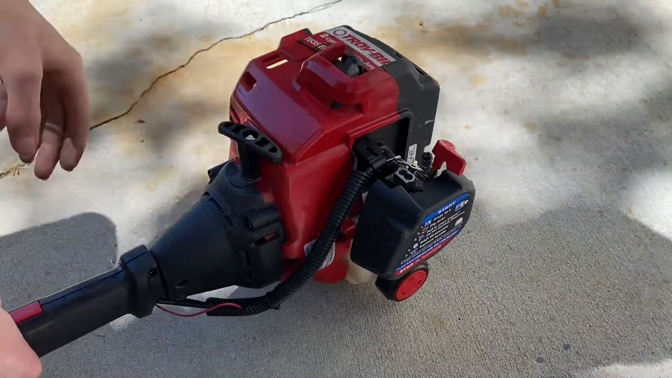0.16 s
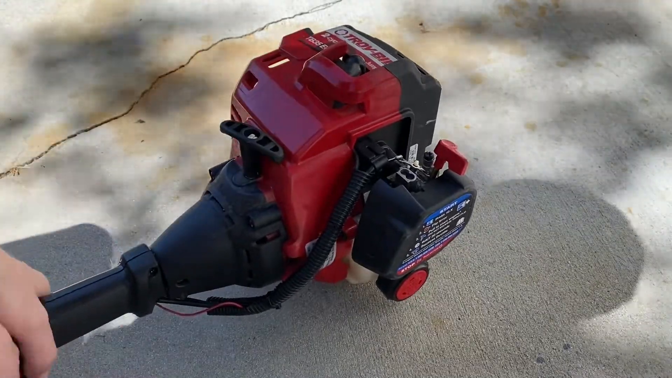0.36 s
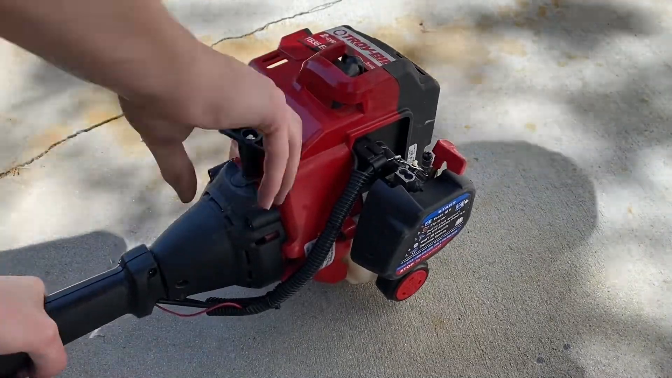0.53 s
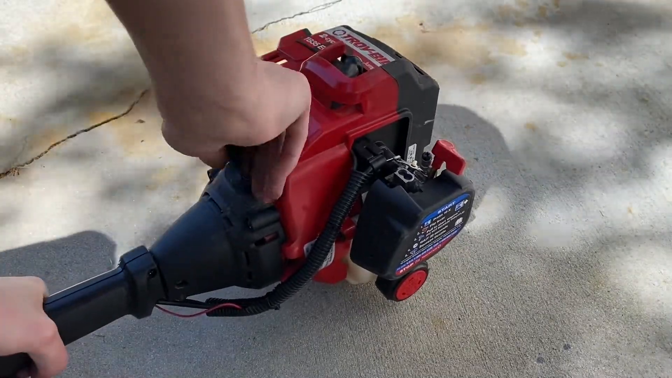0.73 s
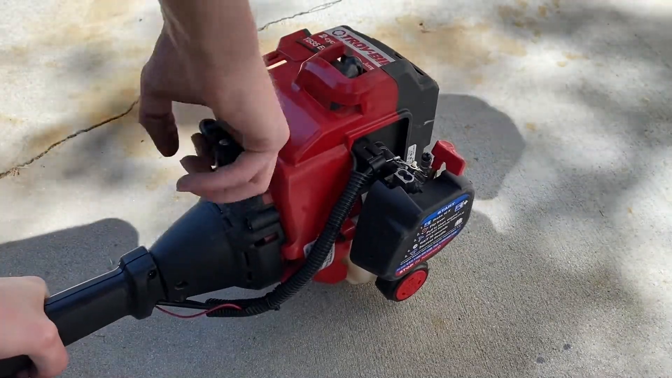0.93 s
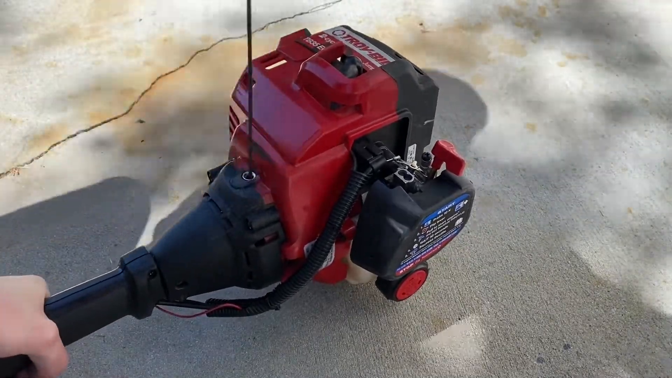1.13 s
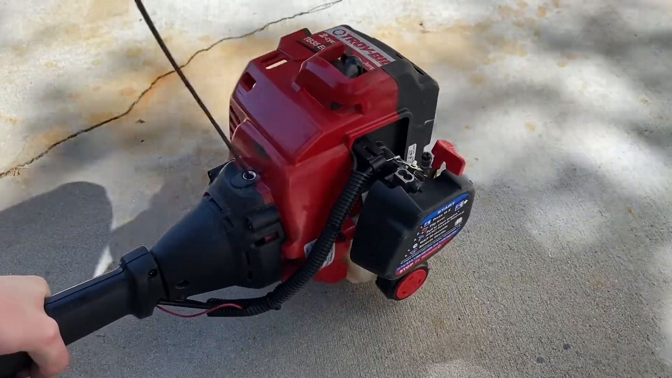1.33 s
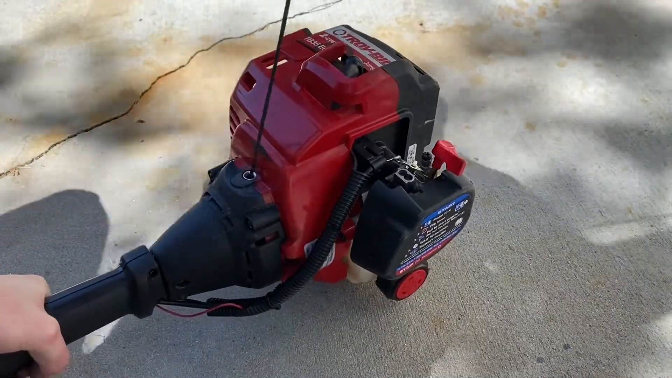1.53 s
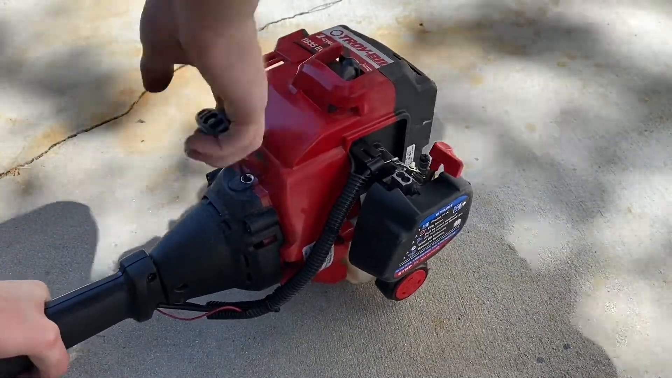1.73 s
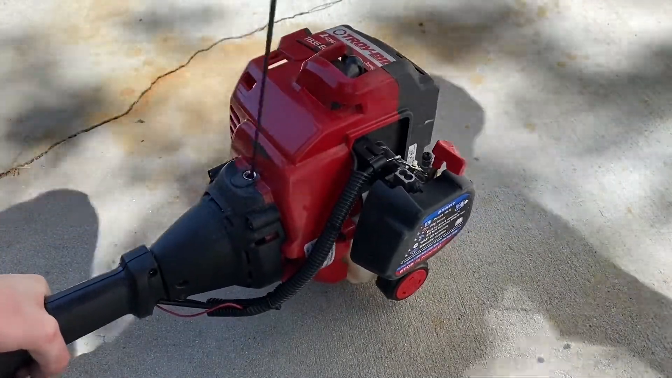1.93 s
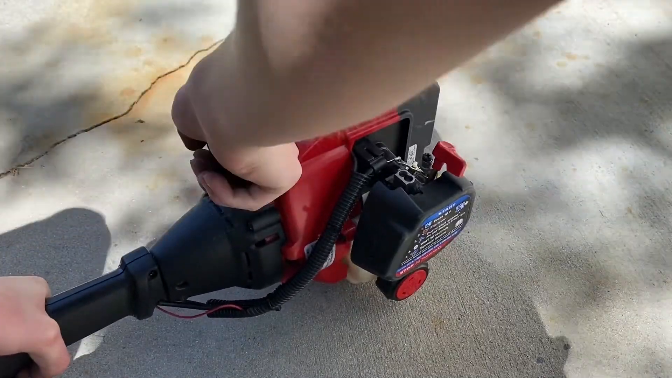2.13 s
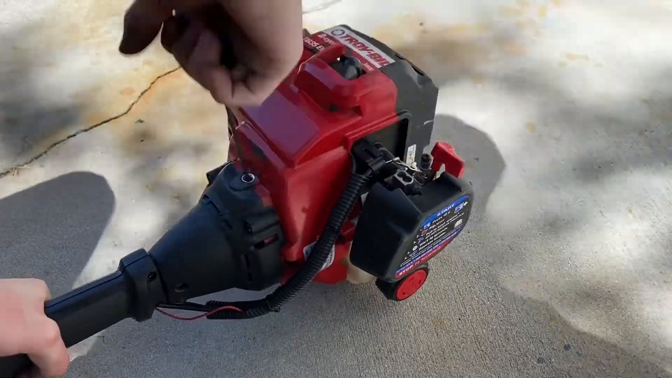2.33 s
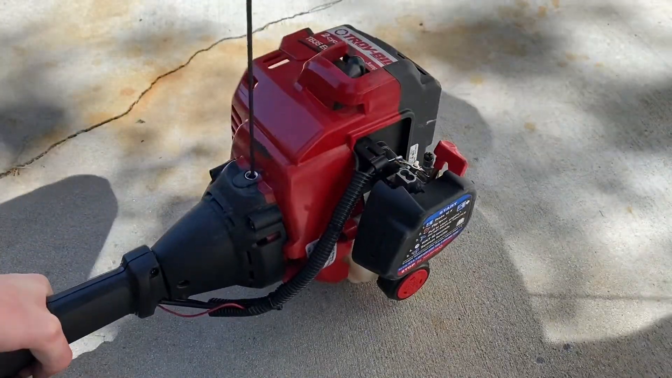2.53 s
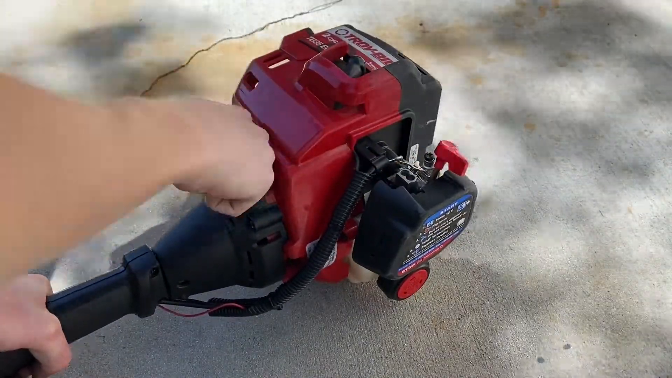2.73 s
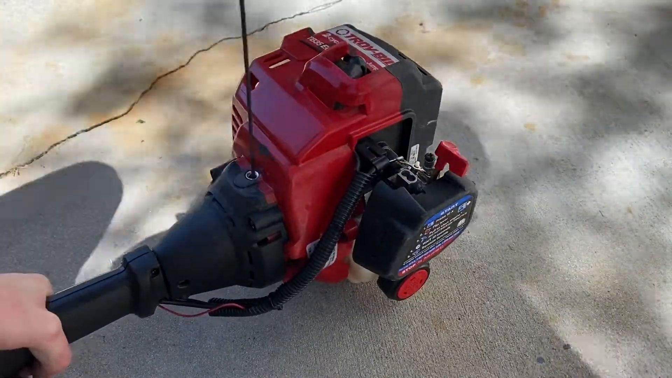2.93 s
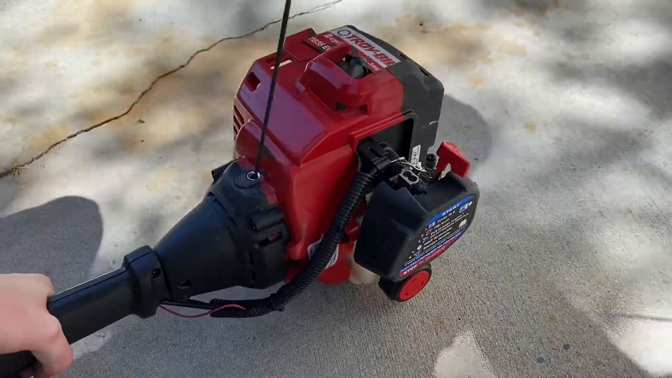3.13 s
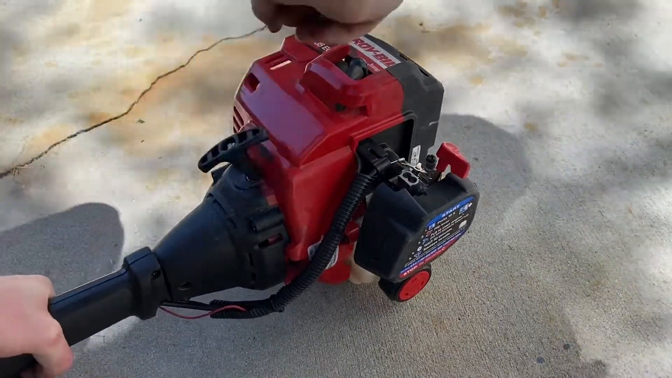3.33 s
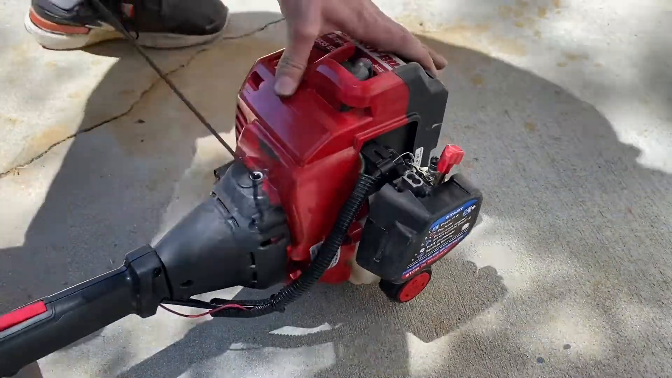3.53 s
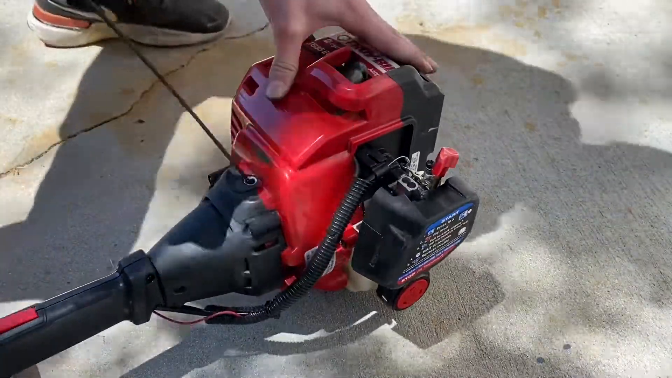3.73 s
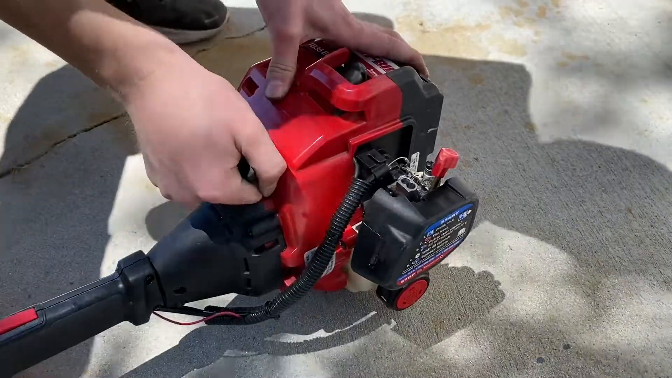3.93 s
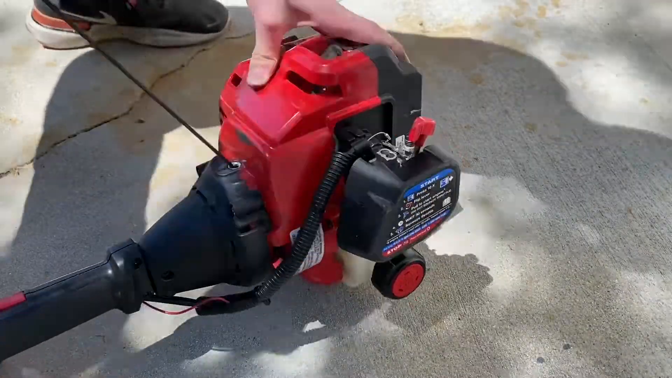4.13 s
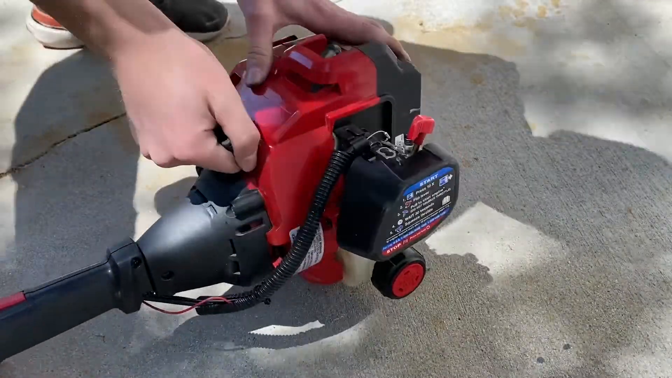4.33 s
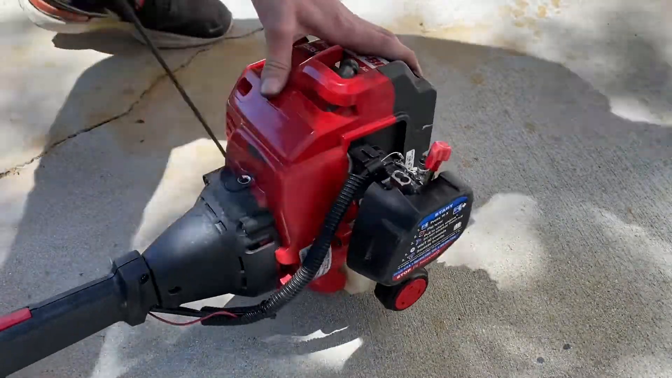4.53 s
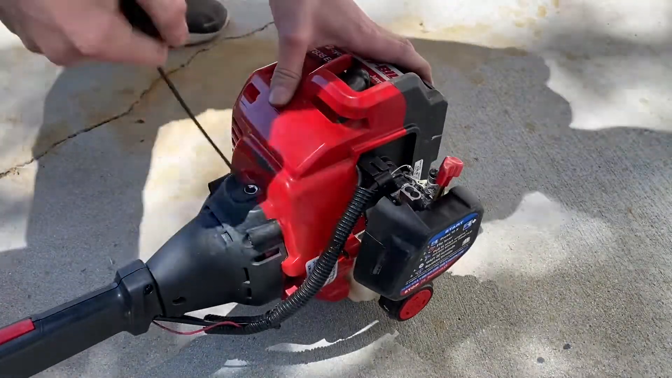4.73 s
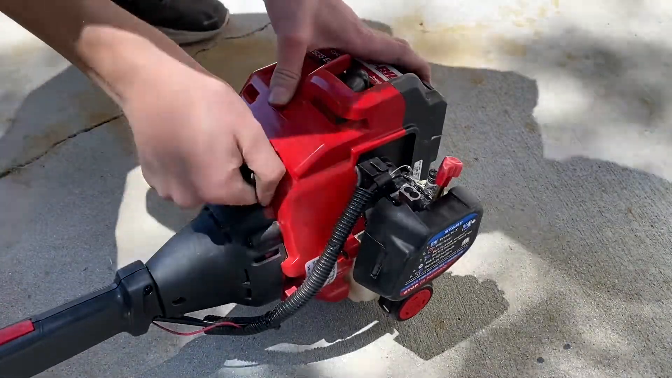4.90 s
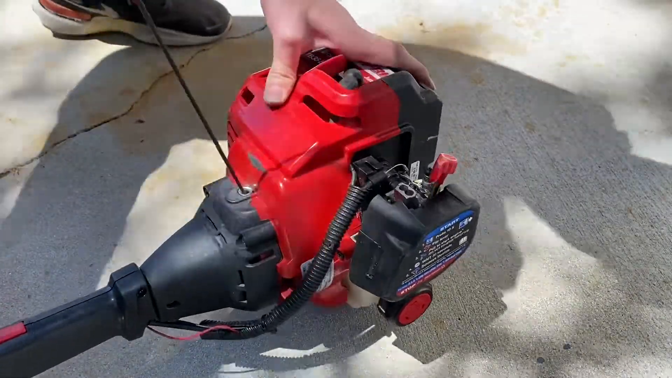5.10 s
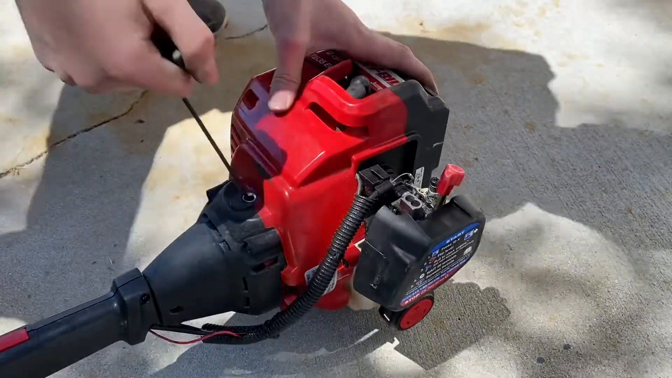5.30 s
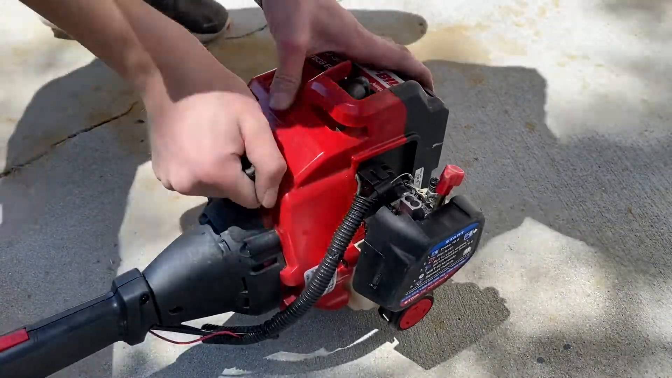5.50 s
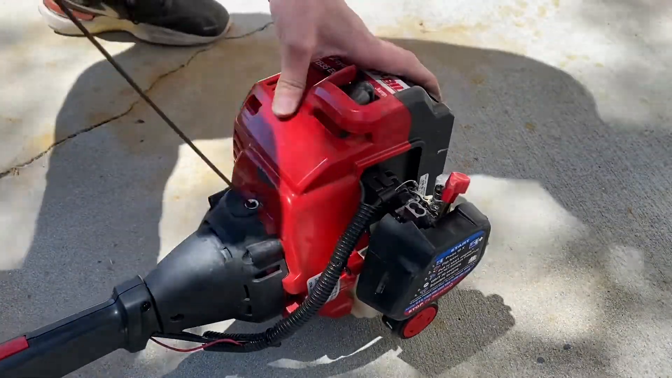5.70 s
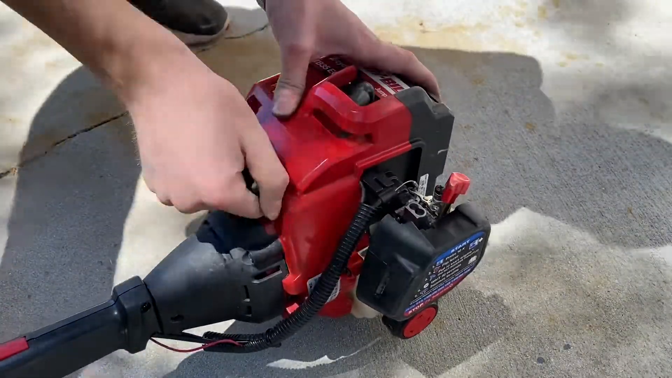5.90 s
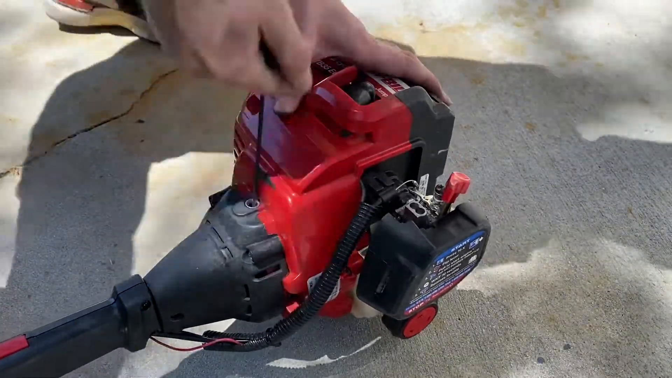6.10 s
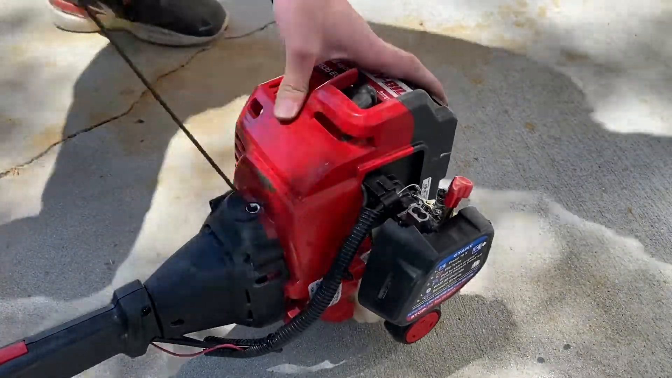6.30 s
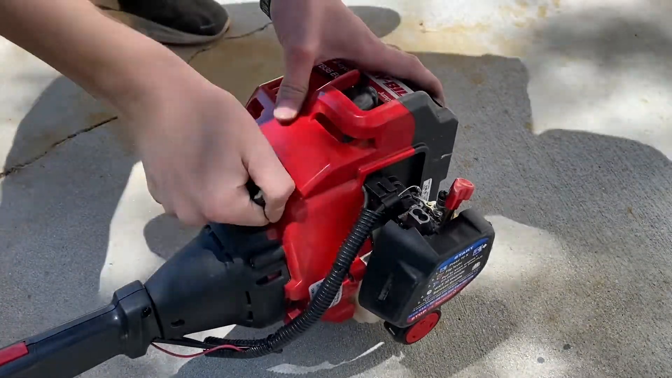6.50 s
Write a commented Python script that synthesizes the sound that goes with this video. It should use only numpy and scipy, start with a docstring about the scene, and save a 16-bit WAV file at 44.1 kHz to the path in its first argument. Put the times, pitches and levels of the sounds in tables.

```python
"""On a concrete drive, a string trimmer's starter cord is pulled eleven times; the two-stroke never fires.
Each pull: the pawls catch, the cord rasps out, the piston puffs through a few turns, the cord jolts to a stop,
and the spring winds it back over a ticking, ringing ratchet. Five easy pulls are followed by six hard ones.
Puffs are pulses through a muffler colour; rattles, rasps and knocks are noise ringing a casing.
Around them: loose knocks, a sliding hand, a faint squeak, a scattered echo and distant rumble."""
import sys
import numpy as np
from scipy import signal
from scipy.fft import rfft, irfft
from scipy.io import wavfile

SR = 44100
rng = np.random.default_rng(int(sys.argv[2]) if len(sys.argv) > 2 else 0)


def master(y):
    """Save y as 16-bit WAV."""
    cut = np.clip(np.atleast_2d(y).T, -1, 1)
    pcm = np.round(cut * 32767)  # scale
    wavfile.write(sys.argv[1], SR, pcm.astype(np.int16))


N = 288855
T = np.arange(N) / SR  # seconds


def amp(db):
    """Decibels to gain."""
    return 10 ** (np.asarray(db) / 20)


def unit(x):
    """Scales a sound to rms 1."""
    return x / np.sqrt(np.mean(x ** 2) + 1e-20)


def read(points, hz):
    """Reads between the points of a table on a log-frequency axis."""
    f, value = np.transpose(points)
    return np.interp(np.log(hz + 1), np.log(f + 1), value)


def add(mix, s, sound):
    """Mixes a sound in at time s, in seconds."""
    part = mix[max(round(s * SR), 0):][:len(sound)]
    part += sound[:len(part)]


def convolve(x, response):
    """Plays a signal through one response per channel."""
    return signal.oaconvolve(np.atleast_2d(x), np.atleast_2d(response), axes=1)[:, :N]


def colour(points, size=4096):
    """Turns a spectrum into a response of energy 1 that starts at once (minimum phase)."""
    hz = abs(np.fft.fftfreq(size, 1 / SR))
    log_gain = np.log(amp(np.maximum(read(points, hz), -90)))
    spectrum = np.exp(np.conj(signal.hilbert(log_gain)))
    response = np.fft.ifft(spectrum).real[:size // 2]
    return response / np.linalg.norm(response)


def grains(per_s, spread_db):
    """Random tiny impacts of uneven size, rms 1."""
    size = amp(spread_db * np.minimum(rng.exponential(1, N), 3.5)) * rng.choice([-1, 1], N)
    return unit(size * (rng.random(N) < per_s / SR))


# Resonances of the plastic shell. Each row: pitch in Hz, width in Hz, level in dB.
SHELL_MODES = [(888, 22, -2), (1544, 28, -11.5), (1700, 18, -13), (2570, 64, -6.5), (3220, 42, -15.5),
               (5110, 27, -10.5), (5480, 78, -3.5)]


def shell(x):
    """The shell's resonances ring on top of whatever shakes it."""
    ringing = sum(amp(db) * signal.lfilter(*signal.iirpeak(hz, hz / width, fs=SR), x)
                  for hz, width, db in SHELL_MODES)
    return x + ringing


def body(x, points, t60, ring_db, apart, count=6):
    """Impacts land on changing spots of the casing: a direct tick, then dense short modes, differing by ear."""
    t = np.arange(3000) / SR
    spot = rng.integers(0, count, N)[np.arange(N) // 32]  # a new spot every 32 samples
    out = np.zeros((2, N))
    for k in range(count):
        shared = rng.standard_normal(len(t))
        tail = (shared + apart * rng.standard_normal((2, len(t)))) * amp(-60 * t / t60)
        tail *= amp(ring_db) / np.linalg.norm(tail[0])
        tail[:, 0] += 1  # the direct tick
        out += convolve(x * (spot == k), tail / np.linalg.norm(tail[0]))
    return amp(-0.48) * shell(convolve(out, colour(points)))


# The pulls of the cord. Each row: time the pawls catch in seconds, then seconds after it until the engine
# is up to speed and until the cord stops, turns per second at full speed, then relative levels in dB of
# catch, puffs, rattle, cord and jolt, and 0 for an easy or 1 for a hard pull.
PULLS = [ (1.100, 0.059, 0.097, 50.18, -21.5, -16.5, -22.5, -24.5, -28, 0),
         (1.423, 0.048, 0.12, 50.86, -22, -17.5, -21, -25.5, -25, 0),
         (1.744, 0.052, .110, 53.1, -52, -15.5, -19.5, -28, -11.5, 0),
         (2.329, .052, .110, 52.5, -32, -17, -19, -24.5, -12.5, 0),
         (2.919, .047, .100, 52.05, -21, -16.5, -22, -22.5, -10, 0),
         (3.469, 0.039, 0.084, 63.83, -20, -15.5, -18, -23.5, -8.5, 1),
         (3.984, .041, 0.089, 67.16, -25.5, -18, -19.5, -21.5, -8, 1),
         (4.495, .042, 0.081, 67.9, -29.5, -16, -17, -23, -13, 1),
         (4.993, .044, 0.086, 64.9, -21, -18, -18, -22.5, -9, 1),
         (5.532, 0.046, 0.099, 62.5, -31.5, -19.5, -19.5, -25, -11.5, 1),
         (6.096, .048, .099, 62.5, -41, -19, -20, -27.5, -11.5, 1)]
COAST_S = .078  # the engine runs on for this long after the cord stops


def crank(pull, spin_up=.007, dragging=0.65, last=.4):
    """The crank is dragged over compression, snaps up to speed, then coasts: times, relative speed, turns."""
    catch, fast, stop, rate = pull[:4]
    rest = stop + COAST_S
    t = np.arange(0, rest, 1 / SR)
    moments = [0, fast - spin_up, fast, stop + spin_up, (stop + rest) / 2, rest]
    speed = np.interp(t, moments, [.1, dragging, 1, 1, .6, last])
    turns = np.cumsum(speed) * rate / SR
    return catch + t, speed, turns - np.interp(fast, t, turns)  # turn 0 is when it gets up to speed


def chamber(x, hz=750, width_hz=600):
    """A muffler chamber holds its own pitch back for a moment, which spreads out each puff."""
    return x - 2 * signal.lfilter(*signal.iirpeak(hz, hz / width_hz, fs=SR), x)


# Gas puffs in a turn: exhaust, transfer, intake. Each row: place as a share of a turn, relative strength
# in dB in an easy pull and in a hard pull, fading time of the puff in seconds.
PORTS = [(0, -2, -2, 0.00015), (0.364, 0.5, -4, 0.001), (0.691, -3, -11, .0004)]


def port_puffs(turns, hard, gust=0.099, uneven_db=5.5):
    """Each port opens once a turn: an uneven pulse of gas and a gust fading over the turn."""
    puffs, gusts = np.zeros((2, len(turns)))
    for share, easy_db, hard_db, length in PORTS:
        strength = amp(hard_db if hard else easy_db)
        opens = np.diff(np.floor(turns - share), prepend=np.floor(turns[0] - share))
        pulses = opens * amp(uneven_db * rng.standard_normal(len(turns)))
        keep = np.exp(-1 / (length * SR))
        puffs += strength * signal.lfilter([1 - keep], [1, -keep], pulses)
        gusts += strength * np.exp(-((turns - share) % 1) / gust)
    return puffs, gusts


# Colour of the muffler and air box in easy and in hard pulls. Each row: pitch in Hz, level in dB.
EASY_GAS = [(35, -37), (65, -26), (100, 0), (150, -5), (215, 4), (320, 0.5), (400, -9.5), (480, 4),
            (600, -9), (750, -2.5), (1100, -16), (1480, -2.5), (2200, -16.5), (3500, -34.5)]
HARD_GAS = [(35, -34), (65, -19), (110, 6), (170, 2.5), (320, 4), (480, 1), (620, 3), (760, -3.5), (880, 5),
            (1070, -16), (1300, 1.5), (1650, -4.5), (2300, -2), (3500, -27.5)]
# Colour of the rattling engine. Each row: pitch in Hz, level in dB.
RATTLE = [(350, -32.5), (600, -0.5), (698, -1), (779, -4.5), (869, -4.5), (1080, -5.5), (1450, -6),
          (1830, -13), (2830, -4.5), (3830, -8.5), (4340, -15.5), (5190, -11), (8390, -19.5),
          (14500, -19.5), (16000, -24)]
EDDIES = .55  # turbulent noise, as a gain beside the puffs


def engine(gas_power=2.0, rattle_power=3.1, steady=0.22, soft_hz=350, sharp_power=4):
    """Every turn pumps three puffs through the muffler; each sets off a gust of hiss and rattle."""
    gas, shake = np.zeros(N), np.zeros(N)
    for pull in PULLS:
        t, speed, turns = crank(pull)
        puff_db, rattle_db, hard = pull[5], pull[6], pull[9] > .5
        puffs, gusts = port_puffs(turns, hard)
        muffler = colour(HARD_GAS if hard else EASY_GAS)
        flow = unit(chamber(convolve(puffs, muffler)[0, :len(t)]))
        hiss = gusts * rng.standard_normal(len(t))
        flow += EDDIES * unit(convolve(hiss, muffler)[0, :len(t)])
        # a slow piston uncovers the ports gently, so its puffs are dull
        dull = signal.sosfilt(signal.butter(2, soft_hz, fs=SR, output="sos"), flow)
        sharp = speed ** sharp_power
        flow = sharp * flow + (1 - sharp) * dull
        smooth_ends = signal.windows.tukey(len(t), .1)
        add(gas, t[0], amp(puff_db - 2.5) * flow * speed ** gas_power * smooth_ends)
        add(shake, t[0], amp(rattle_db) * unit(steady + gusts) * speed ** rattle_power)
    rattling = shake * grains(per_s=6000, spread_db=2.5)
    return gas + body(rattling, RATTLE, t60=0.0082, ring_db=1.5, apart=0.84)


# Colours of the running cord and of blows on the plastic housing. Each row: pitch in Hz, level in dB.
CORD = [(210, -58.5), (350, -15.5), (899, -6), (1240, -5), (1680, -2.5), (1880, -7), (2540, -2), (2940, -7),
        (6130, -6.5), (8310, -11), (12200, -13), (14500, -12), (16000, -14)]
HOUSING = [(240, -50.5), (400, -25), (1250, -10.5), (1560, -0.5), (1990, -10.5), (2360, -4), (3750, -6.5),
           (4510, -5.5), (5600, -7.5), (6050, -8), (8370, -12.5), (14400, -14.5), (16000, -4.5)]


def cord(jolt_s=0.0087, settle_s=0.0017, slack=0.13):
    """The cord takes up its slack, rasps through the eyelet, then jerks the starter to a clattering stop."""
    rasp, jolt = np.zeros((2, N))
    t = np.arange(SR // 8) / SR
    for catch, fast, stop, *_, cord_db, jolt_db, _ in PULLS:
        moments = [-.016, -.001, .002, fast, stop, stop + 0.023]
        rasp += amp(cord_db) * np.interp(T - catch, moments, [0, slack, .65, 1.1, 1.1, 0])
        jerk = np.minimum(t / 0.0019, 1) * np.exp(-np.maximum(t - jolt_s, 0) / settle_s)
        add(jolt, catch + stop, amp(jolt_db) * jerk)
    running = body(rasp * grains(per_s=4000, spread_db=2.5), CORD, t60=0.015, ring_db=2, apart=0.85)
    clatter = jolt * grains(per_s=12000, spread_db=0.5)
    return running + body(clatter, HOUSING, t60=.02, ring_db=3.5, apart=1.9)


# Ringing of the steel pawls. Each row: pitch in Hz, level in dB, time to fade by 60 dB in seconds.
PAWL_MODES = [(13810, -4, .05), (13950, -7, .02), (14130, 0, .05), (14440, 0, .05), (14600, -4, .015),
              (14905, -4, .035), (15240, -7, .03)]


def pawls(clicks):
    """Struck steel pawls ring at a cluster of very high pitches."""
    t = np.arange(SR // 6) / SR
    ring = sum(amp(db - 60 * t / t60) * np.sin(2 * np.pi * hz * t) for hz, db, t60 in PAWL_MODES)
    return convolve(clicks, ring / np.linalg.norm(ring))


TICKS_PER_S = 121  # ratchet rate with the pulley at full speed


def tooth_drops(t, last, end_rate, slowing_s=.07, second_pawl=.3, second_db=-8, chatter_s=0.00067,
                uneven_db=1.5):
    """Two pawls drop over each tooth and chatter briefly, slowing to end_rate ticks per second; rms 1."""
    rate = TICKS_PER_S + (end_rate - TICKS_PER_S) * np.exp(-np.maximum(last - t, 0) / slowing_s)
    teeth = np.cumsum(rate) / SR
    teeth -= np.interp(last, t, teeth)  # a tooth falls exactly on the last tick
    force = amp(uneven_db * rng.standard_normal(64))[np.floor(teeth).astype(int) % 64]
    age = (teeth - np.array([[0], [second_pawl]])) % 1 / rate / chatter_s
    first, second = age * np.exp(-age)
    return unit(force * (first + amp(second_db) * second))


# The spring winding the cord back in. Each row: time the pulley turns back and time of the last tick in
# seconds, ticks per second at the end, then relative levels in dB of the slipping ring, first knock, ticks
# and pawl ring, and the fade over the run in dB.
REWINDS = [ (1.26, 1.389, 56, -34, -23.5, -23, -21, 12.5), (1.602, 1.722, 70, -24, -21.5, -24.5, -25, 5),
           (1.889, 2.045, 80, -20, -36, -26, -19, 7), (2.524, 2.695, 50.7, -21, -41, -30, -23.5, 2.5),
           (3.101, 3.256, 111, -21, -27.5, -31, -27, -0.5), (3.606, 3.809, 56, -30, -39, -35, -32, -3),
           (4.140, 4.279, 39, -25, -45, -37, -29.5, -4), (4.631, 4.777, 60, -26, -38, -27.5, -20, 8.5),
           (5.172, 5.338, 48.6, -20, -45, -35.5, -28, -1.5), (5.697, 5.862, 47, -12, -47, -33.5, -24.5, 4),
           (6.279, 6.435, 55, -19, -44, -32.5, -25.5, 2)]
# Colour of the ratchet. Each row: pitch in Hz, level in dB.
RATCHET = [(240, -50.5), (400, -20), (594, -15.5), (678, -13), (896, -10.5), (1170, -11.5), (1470, 1),
           (1890, -4), (2540, 2), (2940, -5), (3300, 1), (5050, -3.5), (8570, -7.5), (12200, -2),
           (13300, -6.5)]
# the pawls first slip over the halted pulley: delay after the cord stops, first tick level, fading
SLIP_DELAY_S, SLIP_TICK_DB, SLIP_FADE_DB_PER_S = .013, -25.5, 329
RING_FADE_DB = 3  # the pawls' ring fades this much more than the ticks over a rewind


def ratchet(scrape_db=-14, settle_s=0.034, settle_db=-16, pick_up_s=0.005, run_on_s=.008):
    """Pawls tick as the engine coasts, then as the cord scrapes back in; the spring settles."""
    ticks, rings, scrape = np.zeros((3, N))
    after = np.arange(SR // 5) / SR
    for pull, rewind in zip(PULLS, REWINDS):
        catch, _, stop, *_ = pull
        back, last, end_rate, slip_db, _, tick_db, ring_db, fade_db = rewind
        t = np.arange(catch + stop + SLIP_DELAY_S, last + run_on_s, 1 / SR)
        drops = tooth_drops(t, last, end_rate)
        slipping = amp(-SLIP_FADE_DB_PER_S * (t - t[0]))
        wound_in = (t - back) / (last - back)
        winding = np.clip(1 + (t - back) / pick_up_s, 0, 1) * amp(-fade_db * wound_in)
        tick = np.hypot(amp(SLIP_TICK_DB) * slipping, amp(tick_db) * winding)
        ring = np.hypot(amp(slip_db) * slipping, amp(ring_db - RING_FADE_DB * wound_in) * winding)
        add(ticks, t[0], drops * tick)
        add(rings, t[0], drops * ring)
        add(scrape, t[0], amp(scrape_db) * tick)
        add(scrape, t[-1], amp(tick_db - fade_db + settle_db) * np.exp(-after / settle_s))
    drive = ticks * grains(per_s=15000, spread_db=4.0) + scrape * rng.standard_normal(N)
    casing = body(drive, RATCHET, t60=0.05, ring_db=3.0, apart=0.91)
    return amp(2.5) * casing + amp(-2.5) * pawls(rings * rng.standard_normal(N))


# The handle and slack cord knocking on the housing. Each row: time in seconds, relative level in dB.
LOOSE_KNOCKS = [(0.002, -26.5), (0.331, -47.5), (0.61, -47.5), (0.829, -45.5), (1.029, -33), (1.228, -23),
                (1.374, -29), (2.057, -22), (2.318, -37), (2.327, -30), (2.495, -28.5), (3.266, -16),
                (3.37, -36.5), (3.412, -44.5), (3.777, -30.5), (3.84, -33.5), (3.85, -32.5), (4.328, -34),
                (4.426, -48.5), (4.48, -37.5), (5.206, -34), (5.3, -34), (5.888, -34.5), (5.91, -41.5),
                (5.924, -42), (6.454, -26.5), (6.467, -34.5)]
COMPRESSION_DB = -22.5  # relative level of the knock as the piston first goes over the top


def knocks(contact_s=0.0019, body_db=2, steel_db=-18):
    """Short rough blows ring housing and pawls: catch, compression, pulley turning back, loose handle."""
    hits = list(LOOSE_KNOCKS)
    for catch, fast, _, _, catch_db, *_ in PULLS:
        hits += [(catch, catch_db), (catch + fast, COMPRESSION_DB)]
    hits += [(back, knock_db) for back, _, _, _, knock_db, *_ in REWINDS]
    blows = np.zeros(N)
    t = np.arange(SR // 80) / SR
    for s, db in hits:
        blow = rng.standard_normal(len(t)) * np.sqrt(t) * np.exp(-t / contact_s)
        add(blows, s, amp(db) * unit(blow))
    plastic = body(blows, HOUSING, t60=0.058, ring_db=-0.5, apart=1.7)
    return amp(body_db) * plastic + amp(steel_db) * pawls(blows)


# A hand sliding over shaft and handle. Each row: time of the stroke's height in seconds, its length in
# seconds, relative level in dB.
HAND_STROKES = [(0.13, 0.34, -67), (0.345, 0.23, -57), (0.60, 0.079, -62), (0.83, 0.19, -56.5),
                (1.023, .07, -55.5)]
# Colour of the rustling skin. Each row: pitch in Hz, level in dB.
RUSTLE = [(700, -36), (1500, -7), (1800, -0.5), (2400, -15), (3600, -2.5), (6000, -15), (8300, -7.5),
          (15000, -18)]


def hand(skin_db=-2):
    """Skin brushes over plastic: each stroke of tiny impacts swells and dies away."""
    stroke = sum(amp(db + skin_db) * np.cos(np.pi * np.clip((T - s) / length, -.5, .5)) ** 2
                 for s, length, db in HAND_STROKES)
    return body(stroke * grains(per_s=7600, spread_db=0.0), RUSTLE, t60=.03, ring_db=7.5, apart=1.2)


def squeak(start=0.09, length=0.092, hz=3650, width_hz=450, db=-61):
    """A faint squeak as the fingers leave the handle: a narrow band of noise that swells and fades."""
    rub = signal.lfilter(*signal.iirpeak(hz, hz / width_hz, fs=SR), rng.standard_normal(N))
    return amp(db) * unit(rub) * np.sin(np.pi * np.clip((T - start) / length, 0, 1))


def yard(x, t60=.3, wet_db=-25, low_hz=500):
    """A faint scatter from the surroundings: a fading tail of noise without bass or top treble."""
    t = np.arange(SR // 2) / SR
    tail = rng.standard_normal((2, len(t))) * amp(-60 * t / t60) * np.minimum(t / 0.0034, 1)
    band = signal.butter(1, [low_hz, 7000], "bandpass", fs=SR, output="sos")
    tail = signal.sosfilt(band, tail)
    return amp(wet_db) * convolve(x, tail / np.linalg.norm(tail[0]))


# Colour of the distant outdoor rumble. Each row: pitch in Hz, level in dB.
AIR = [(25, -34), (50, -38), (85, -8), (150, -2), (215, -0.5), (300, -12.5), (410, -16.5), (475, -11.5),
       (560, -20.5), (1000, -25.5), (2000, -31), (4000, -35.5), (8000, -39.5), (15000, -46)]
AIR_DB = -49  # level of the rumble


def air(apart_hz=1500):
    """Distant rumble, alike in both ears in the bass, under a faint diffuse hiss."""
    hz = np.fft.rfftfreq(N, 1 / SR)
    same = 1 / (1 + (hz / apart_hz) ** 2)
    noise = rfft(rng.standard_normal((3, N)))
    pair = np.sqrt(same) * noise[0] + np.sqrt(1 - same) * noise[1:]
    return amp(AIR_DB) * unit(irfft(pair * amp(read(AIR, hz)), N))


def scene():
    """The trimmer close by, in the open air."""
    trimmer = engine() + cord() + ratchet() + knocks() + hand() + squeak()
    return trimmer + yard(trimmer) + air()


# Level difference of the microphones. Each row: pitch in Hz, left minus right in dB before the bass is evened.
TILT = [(150, -5.5), (350, 5), (700, 1.1), (1400, 4), (2800, 0.9), (5600, 0.7), (10000, 4.5), (14000, 1)]
# Their phase difference. Each row: pitch in Hz, radians by which left leads before the bass is evened.
LEAD = [(180, 0.67), (350, -0.65), (700, -.45), (1300, 1.16), (2800, 0.18), (5600, 0.96), (10000, 1.5),
        (14000, 0.68)]
EDGE_HZ = 15750  # upper band limit


def record(dry):
    """Two closely spaced microphones, the left a little nearer and the bass alike; then the band limit."""
    hz = np.fft.rfftfreq(N, 1 / SR)
    apart = hz ** 4 / (hz ** 4 + 250 ** 4)  # near 0 in the bass, so both sides match there
    half = np.sqrt(amp(apart * read(TILT, hz))) * np.exp(.5j * apart * read(LEAD, hz))
    pair = irfft(rfft(dry) * np.array([half, 1 / half]), N)
    pair = pair / (1 + (pair / .85) ** 4) ** .25  # the input stage rounds off the tallest peaks
    band_limit = signal.firwin(511, EDGE_HZ, window=("kaiser", 8), fs=SR)
    return signal.oaconvolve(pair, band_limit[None], "same", axes=1)


dry = scene()
out = record(dry)
master(out)
```